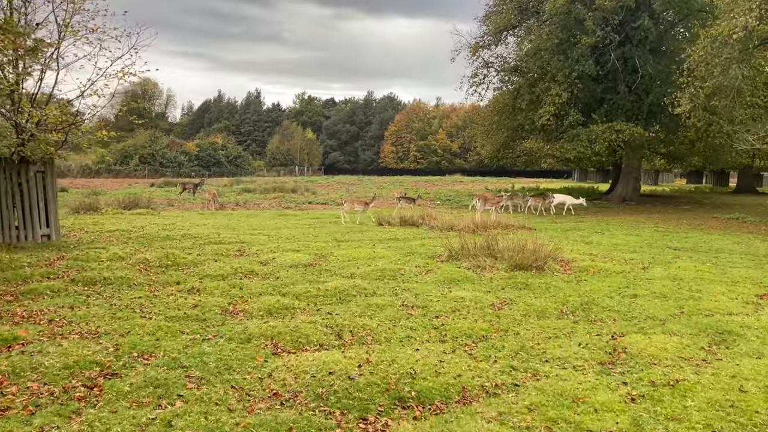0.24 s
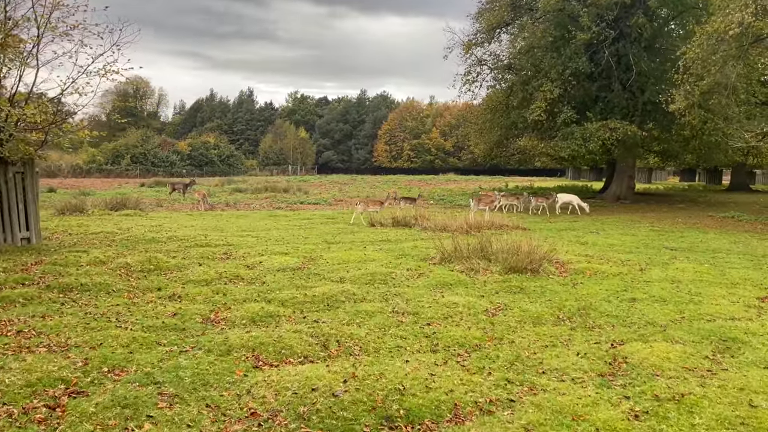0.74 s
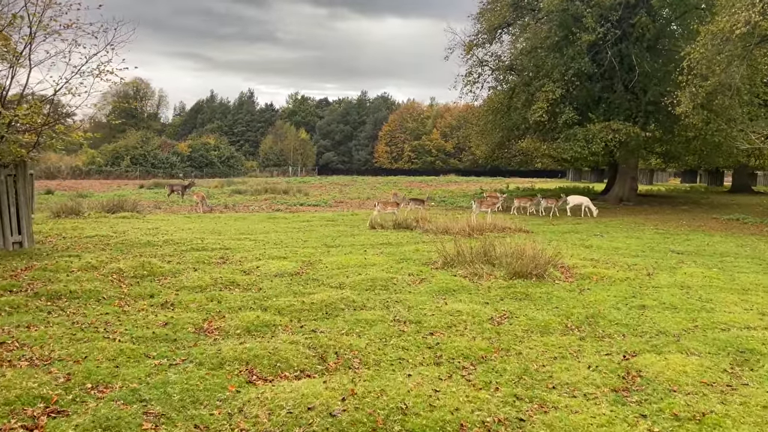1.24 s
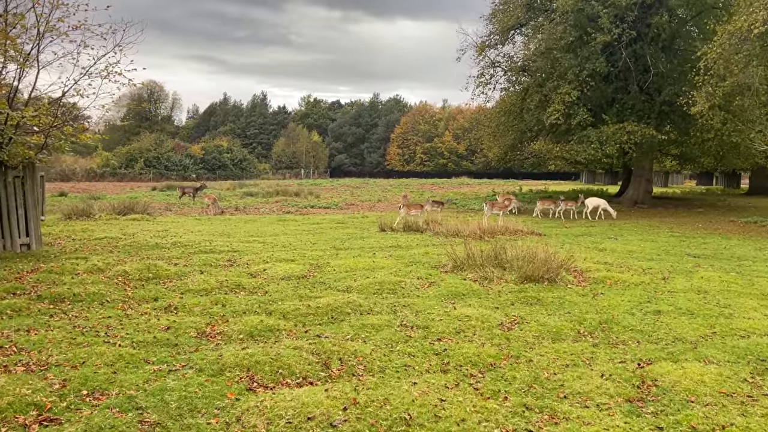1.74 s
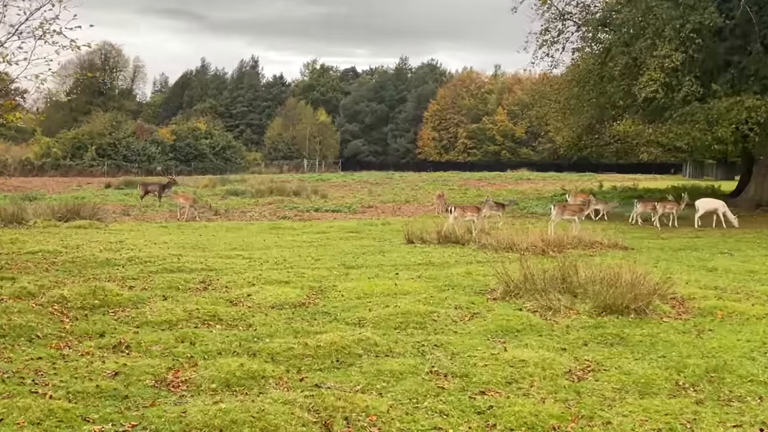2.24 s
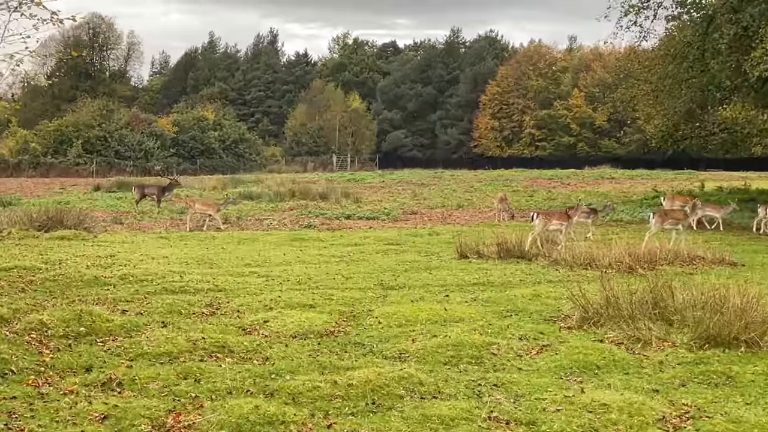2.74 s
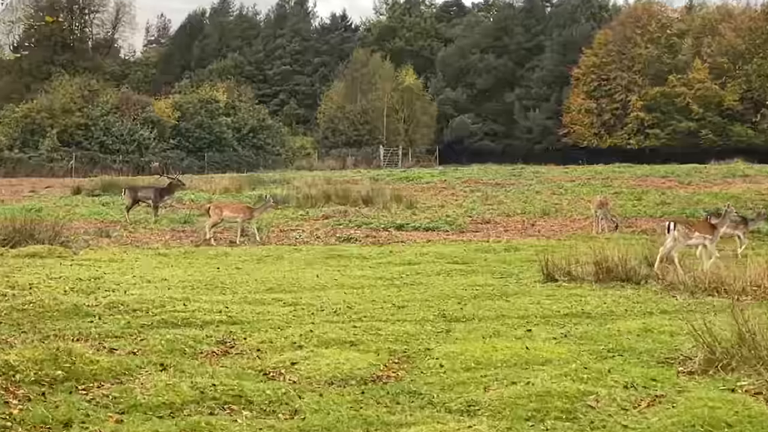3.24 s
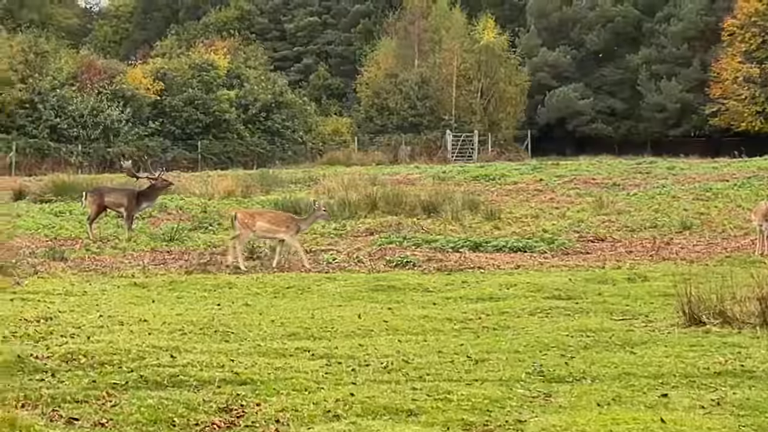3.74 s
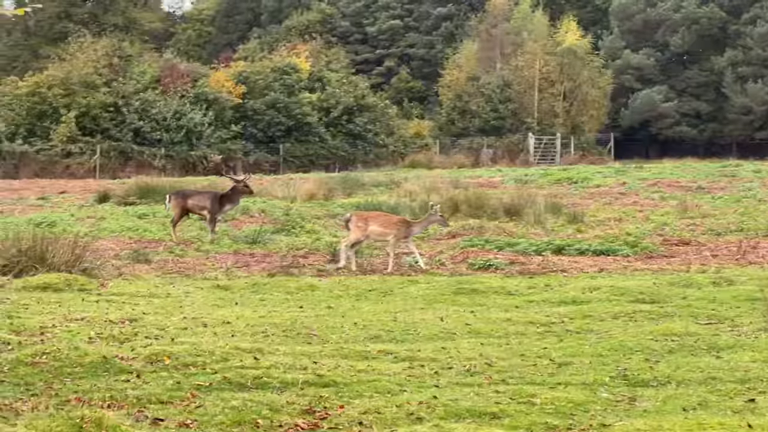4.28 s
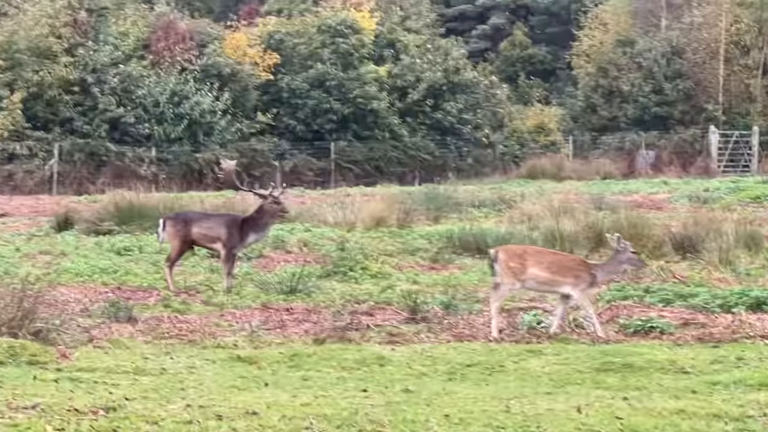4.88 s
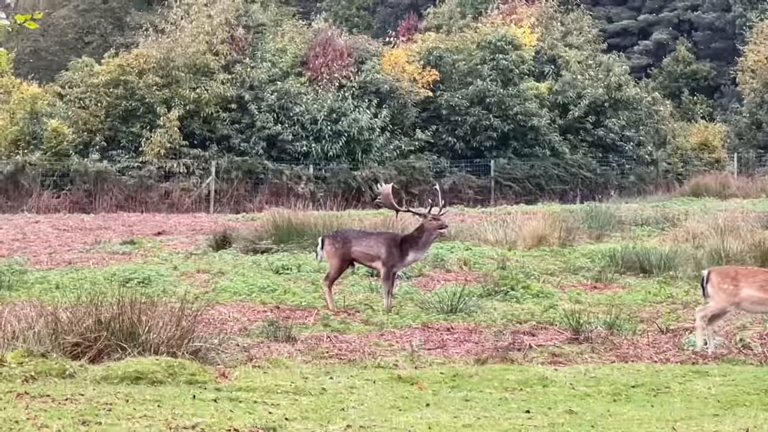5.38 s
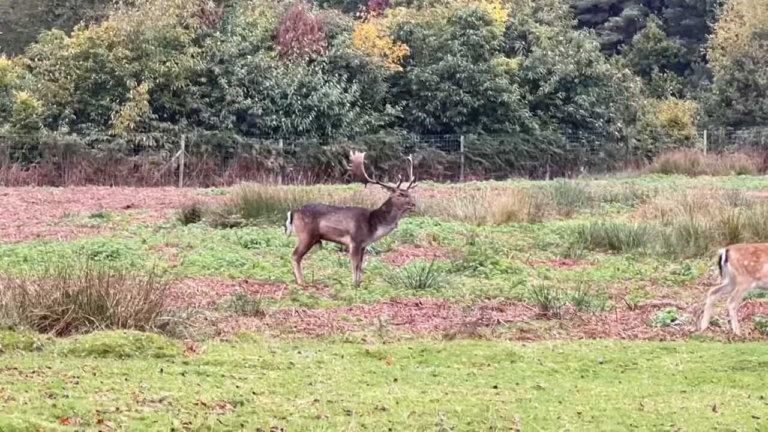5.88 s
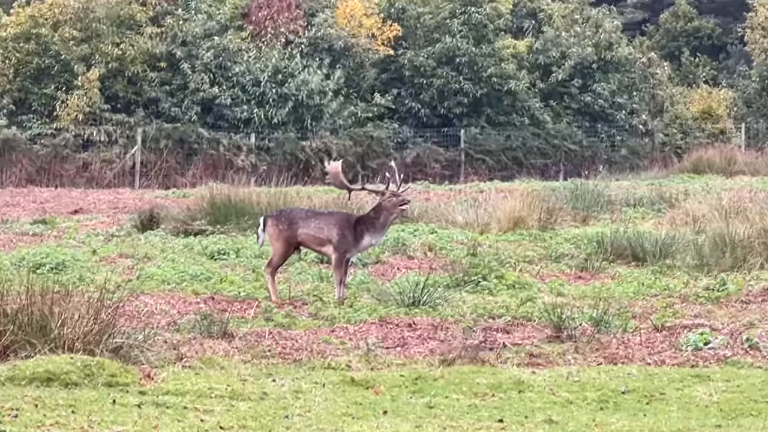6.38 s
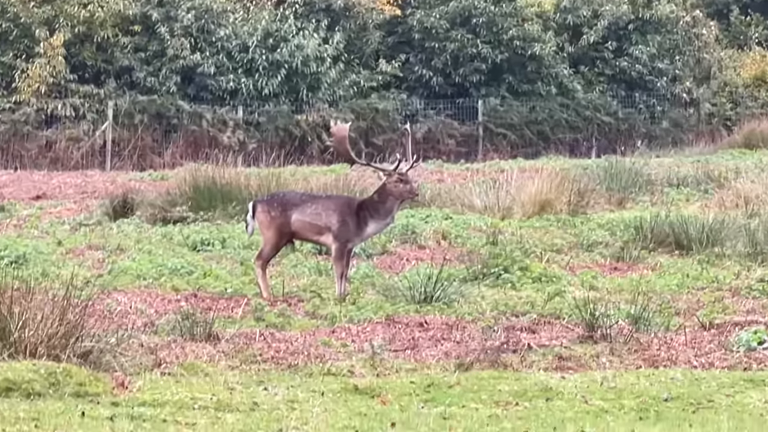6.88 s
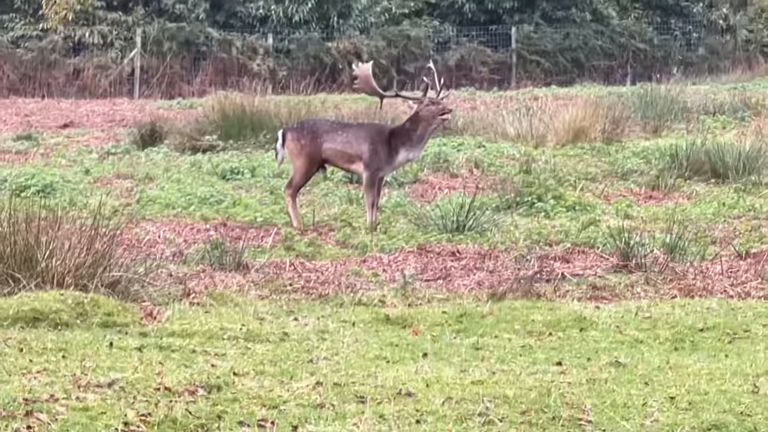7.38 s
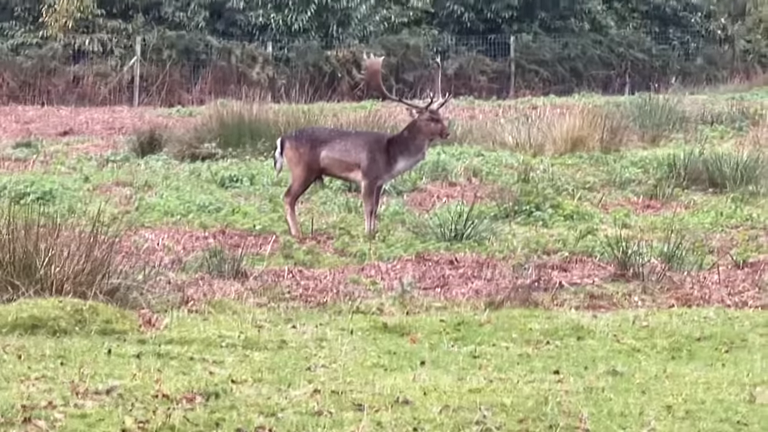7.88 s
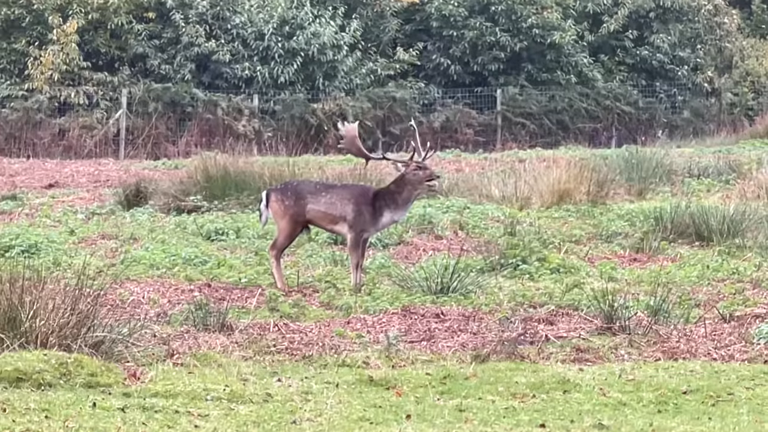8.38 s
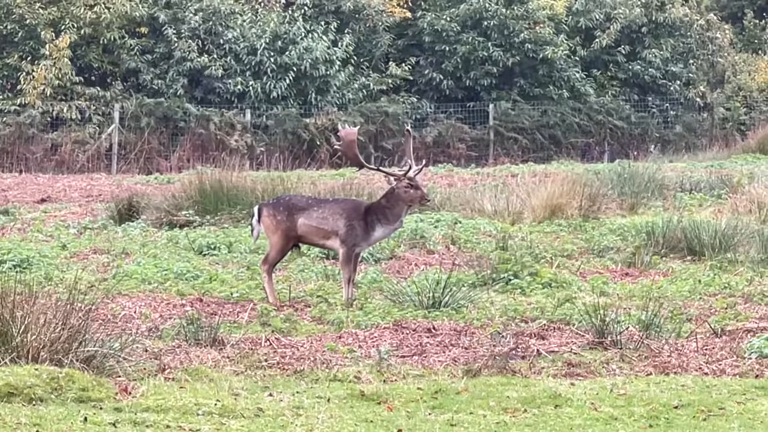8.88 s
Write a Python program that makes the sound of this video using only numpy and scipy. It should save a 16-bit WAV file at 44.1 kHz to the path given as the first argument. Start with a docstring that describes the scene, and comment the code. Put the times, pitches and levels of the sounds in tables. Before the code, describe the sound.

A hand-held outdoor stereo pickup with soft hiss and wavering low rumble catches a male deer's regular, croaking, belch-like groans, with a slight echo off trees. Jackdaws chirp thinly from a far wood at first. Around the middle come a burst of wind buffeting and two hard thumps; then bright, raspy falling jackdaw cries crowd in between groans before growing distant again.

```python
"""A wavering low rumble of distant traffic and wind and a faint, slowly rising high hiss of the recorder come first
and lie under it all, with a wash of the open land: shaped noise.
A fallow buck groans ten times across open parkland: slow glottal pulses ring a throat that lengthens in each groan.
Jackdaws, whistled harmonics with half lines and rasp, call from the far wood, then close by, then fainter.
Knocks and brushes sound on the hand-held microphone, and a strong gust buffets it halfway through."""
import sys
import numpy as np
from scipy import signal
from scipy.fft import rfft, irfft, next_fast_len
from scipy.io import wavfile

SR = 44100
rng = np.random.default_rng(int(sys.argv[2]) if len(sys.argv) > 2 else 0)


def wav_out(sig):
    """Save sig, one row per channel (or a flat mono array), as 16-bit PCM at SR to the path in sys.argv[1]."""
    wavfile.write(sys.argv[1], SR, np.round(np.clip(np.atleast_2d(sig).T, -1, 1) * 32767).astype(np.int16))


N = 402191
TIME = np.arange(N) / SR
EDGE_HZ = 11850  # upper band limit of the sound


def amp(db):
    """Level law: decibels to amplitude gain."""
    return 10 ** (np.asarray(db) / 20)


def evened(x):
    """Normalisation of power: scales to rms 1."""
    return x / np.sqrt(np.mean(x ** 2) + 1e-20)


def read(points, hz):
    """Interpolation of a spectrum along a logarithmic frequency axis."""
    f, value = np.transpose(points)
    return np.interp(np.log(hz + 1), np.log(f + 1), value)


def add(mix, s, sound):
    """Superposition: adds a sound into the mix at time s."""
    part = mix[max(round(s * SR), 0):][:len(sound)]
    part += sound[:len(part)]


def colour(x, gain):
    """Linear filtering: multiplies the spectrum by a gain given as a function of frequency."""
    n = x.shape[-1]
    size = next_fast_len(n + 1000)
    spectrum = rfft(x, size) * gain(np.fft.rfftfreq(size, 1 / SR))
    return irfft(spectrum, size)[..., :n]


def wander(n, hz):
    """Low-passed noise: a smooth random fluctuation of rms 1, up to about hz."""
    return evened(colour(rng.standard_normal(n), lambda f: np.exp(-(f / hz) ** 2)))


def band_level(x, low_hz, high_hz):
    """Band-limited power: the rms of x between two frequencies."""
    return np.std(colour(x, lambda f: (f > low_hz) & (f < high_hz)))


def field_noise(spectrum):
    """Spatial coherence: two-channel noise is partly alike at the two ports, by frequency."""
    # likeness of left and right: f/Hz, correlation [0-1]
    likeness = [(120, 0.89), (250, 0.61), (700, 0.016), (1800, 0.071), (2600, 0.75), (6000, 1),
                (9000, 0.98)]
    same = lambda f: np.clip(read(likeness, f), 0, .995)
    a, b = rng.standard_normal((2, N))
    mid = colour(a, lambda f: np.sqrt(1 + same(f)))
    side = colour(b, lambda f: np.sqrt(1 - same(f)))
    ports = np.array([mid + side, mid - side])
    return evened(colour(ports, lambda f: amp(read(spectrum, f))))


def rumble_and_gusts(gust_from_db=-36, gust_full_db=-24, waver_db=0.97):
    """Level-dependent spectrum: a low rumble of traffic and wind turns into broader buffeting as it grows."""
    # relative noise spectra of the rumble and of the buffeting: f/Hz, density level/dB
    rumble_spectrum = [(20, -43), (45, -2.5), (70, 0), (115, -4.5), (150, -11.5), (200, -20), (400, -33),
                       (800, -70)]
    gust_spectrum = [(20, -40), (55, -4), (105, -1.5), (160, -7), (250, -15), (330, -23.5), (520, -33.5),
                     (700, -56), (1200, -87)]
    # background rumble, before the waver: t/s, level/dB
    background = [(0, -41.5), (2.4, -42.5), (4.3, -40.5), (5.2, -38.5), (5.7, -51), (6.2, -40.5),
                  (6.7, -52.5), (7.2, -46.5), (8.1, -54.5), (9.12, -46)]
    # gusts: t/s of the centre, length/s, level/dB
    gusts = [(3.416, .16, -35.5), (3.852, 0.22, -36), (4.13, 0.093, -37.5), (4.52, 0.4, -34),
             (4.939, 0.49, -19), (5.961, .16, -37), (8.865, 0.26, -45.5)]
    ramp = .45  # share of a gust spent rising and falling
    power = amp(np.interp(TIME, *np.transpose(background)) + waver_db * wander(N, 4.9)) ** 2
    for s, length, peak_db in gusts:
        envelope = amp(peak_db) * signal.windows.tukey(int(length * SR), ramp)
        add(power, s - length / 2, envelope ** 2)
    db = 10 * np.log10(power)
    push = np.clip((db - gust_from_db) / (gust_full_db - gust_from_db), 0, 1)
    rumble = field_noise(rumble_spectrum)
    buffeting = field_noise(gust_spectrum)
    rumble = rumble / band_level(rumble, 30, 135)
    buffeting = buffeting / band_level(buffeting, 30, 135)
    blend = np.sqrt(1 - push) * rumble + np.sqrt(push) * buffeting  # crossfade of equal power
    return amp(db) * blend


def wash_and_hiss(split_hz=2800, waver_db=1.6):
    """Band-split noise: the far wash of the open land and a faint, slowly rising high hiss of the recorder."""
    # relative spectrum of wash and hiss: f/Hz, density level/dB
    noise_spectrum = [(100, -11.5), (200, -6.5), (350, -6.5), (600, -9), (900, -8.5), (1600, -16.5),
                      (2400, -18.5), (3600, -27), (7000, -29), (11000, -26)]
    # course of the two layers: t/s, low wash level/dB before the waver, high hiss level/dB
    levels = [(0, -51, -62.5), (1.6, -52, -62.5), (2.5, -53.5, -62), (5.1, -53.5, -60.5), (6.6, -53.5, -58),
              (8.1, -55, -59), (9.12, -53, -58)]
    s, low_db, high_db = np.transpose(levels)
    noise = field_noise(noise_spectrum)
    wash = colour(noise, lambda f: 1 / (1 + (f / split_hz) ** 4))
    hiss = noise - wash
    wash = wash / band_level(wash, 400, 1600)
    hiss = hiss / band_level(hiss, 4500, 9500)
    wash_gain = amp(np.interp(TIME, s, low_db) + waver_db * wander(N, 6))
    return wash * wash_gain + hiss * amp(np.interp(TIME, s, high_db))


def slaps(length, top_hz, top_s, push_s):
    """Relaxation rhythm: slaps of the vocal folds quicken with the push, then slacken and fade (times, dB)."""
    slack_hz = 23.3  # pulse rate without push
    release_s, release_db = 0.091, -11  # the groan dies away at its end
    t = np.arange(int(length * SR)) / SR
    rate = slack_hz + (top_hz - slack_hz) * np.exp(-((t - top_s) / push_s) ** 2)
    turns = np.cumsum(rate) / SR
    times = np.interp(np.arange(int(turns[-1]) + 1), turns, t)
    return zip(times, release_db * np.clip(1 - (length - times) / release_s, 0, 1))


def buck(rasp=0.058, rasp_s=0.0068, grit=.012, grit_s=0.026, scatter=0.016, shimmer_db=1.53):
    """Source and filter: each slap, with its puff of air, rings a throat lengthened by the sinking larynx."""
    # throat resonances before tuning: f/Hz larynx up, f/Hz larynx pulled down, width/Hz, level/dB
    throat = [(191, 186, 54, 6), (229, 258, 26.4, 2.5), (395, 402, 34, -4), (656, 516, 50, -6),
              (1132, 983, 37, -2.5), (1380, 1180, 54, -3.5), (1877, 1670, 52, -12), (1970, 2000, 53, -13),
              (2330, 2170, 56, -11), (2935, 2520, 67, -12), (3000, 2880, 100, -7), (3540, 3175, 160, -4),
              (5600, 5200, 810, -12), (8700, 8100, 1100, -13)]
    # groans: t/s, length/s, top pulse rate f/Hz, t/s of the top within the groan, width of the push/s,
    # strength level/dB, chest level/dB, treble level/dB, throat tuning [factor]
    groans = [(0.178, .3, 40.23, 0.13, .078, -34, -1.5, -3, 0.99),
              (1.062, 0.29, 36.46, 0.11, 0.06, -35, 2, -6.5, 0.99),
              (1.913, 0.27, 27.97, 0.089, 0.056, -36, 2.5, -5, 0.98),
              (2.824, 0.31, 33.53, 0.13, 0.083, -36.5, 2.5, 1, .99),
              (3.698, 0.24, 24.27, 0.12, 0.027, -39, 1, -1, 1),
              (4.494, 0.26, 31.73, 0.12, .059, -36, 2.5, -0.5, 1),
              (5.379, .335, 33.44, .112, .06, -33, -8, -2, 0.99),
              (6.202, 0.39, 27.63, 0.22, 0.11, -35, -7, -1.5, 1),
              (7.2, 0.357, 26.13, .071, .255, -36.5, -7, -0.5, 0.98),
              (8.36, 0.28, 24.01, 0.056, 0.064, -38, 1, 1.5, .99)]
    # mouth and ground shape the groan: f/Hz, level/dB
    groan_colour = [(50, -18), (130, 1), (200, 0), (560, 0.5), (760, 6), (1000, -2.5), (1350, -0.5),
                    (1530, -8.5), (1750, 0.5), (3600, 0), (4200, 5), (9000, 9)]
    pull_s, pull_lead_s = 0.13, 0.038  # the larynx starts to drop just before the voice sets in
    out, t = np.zeros(N), np.arange(4000) / SR
    up_hz, down_hz, width, mode_db = np.transpose(throat)
    sign = (-1) ** np.arange(len(throat))  # neighbouring tube modes ring in opposite senses
    decay = np.exp(-np.pi * width[:, None] * t)
    for start, length, top_hz, top_s, push_s, db, chest_db, treble_db, tuning in groans:
        for s, fade_db in slaps(length, top_hz, top_s, push_s):
            larynx_up = np.exp(-(s + pull_lead_s) / pull_s)
            hz = tuning * (down_hz + (up_hz - down_hz) * larynx_up)
            hz = hz * (1 + scatter * rng.standard_normal(len(throat)))
            tilt_db = read([(280, chest_db), (1000, 0), (3000, treble_db)], hz)
            gain = sign * amp(mode_db + tilt_db)
            cycles = hz[:, None] * t
            # each resonance needs about a cycle to build, so the chesty bass follows the click
            build = 1 - np.exp(-cycles)
            ring = gain @ (decay * build * np.sin(2 * np.pi * cycles))
            # a short puff, then a trickle of air that fills the gap to the next pulse
            breath = rasp * np.exp(-t / rasp_s) + grit * np.exp(-t / grit_s)
            slap = rng.standard_normal(len(t)) * breath
            slap[0] += 1
            # no two slaps are equally strong
            strength = amp(db + fade_db + shimmer_db * rng.standard_normal())
            add(out, start + s - .001, strength * signal.fftconvolve(slap, ring)[:len(t)])
    return colour(out, lambda f: amp(read(groan_colour, f)))


def trees(x, build_s=0.037, spread=0.15):
    """Diffuse reverberation: scattered echoes from trunks and crowns, each band dying at its own speed."""
    # echo of the trees: f/Hz, decay time t60/s
    wood = [(150, 0.57), (1000, 0.34), (3300, 0.75), (10000, 0.31)]
    taps = rng.standard_normal((2, SR)) * (rng.random((2, SR)) < .1)  # sparse reflections
    hz, t, z = signal.stft(taps, SR, nperseg=256)
    z = z * amp(-60 * t / read(wood, hz)[:, None]) * (1 - np.exp(-t / build_s))
    mid, side = signal.istft(z, SR, nperseg=256)[1]
    tail = np.array([mid + spread * side, mid - spread * side])
    return signal.fftconvolve(x[None], tail / np.linalg.norm(tail[0]), axes=1)[:, :N]


def caw(length, first_hz, last_hz, lateness, db, rough, tilt_db):
    """Period doubling: a whistled note scoops up and falls, with half lines between its harmonics."""
    # resonance of the beak: f/Hz, level/dB
    beak_curve = [(1200, -17.5), (2000, -3), (3200, 1), (4200, -1), (5200, -3.5), (6600, -6), (8200, -8.5),
                  (10000, -9), (12000, -9)]
    # deep falls break into period doubling: fall [octaves], doubling [0-1]
    doubling_curve = [(.2, 0.1), (.45, 0.75)]
    scoop, scoop_s = .4, .006  # share of the pitch by which the onset starts low, and its time
    warble, warble_hz, bend = .11, 170, 0.01245  # pitch fluctuations, as shares; warble grows with roughness
    burst = 0.77  # extra rasp at the onset
    t = np.arange(int(length * SR)) / SR
    u = t / t[-1]
    opening = np.exp(-(t / scoop_s) ** 2)
    pitch = first_hz * (last_hz / first_hz) ** (u ** lateness) * (1 - scoop * opening)
    slow_bend = bend * wander(len(t), 34.6)
    fast_warble = warble * rough ** 2 * wander(len(t), warble_hz)
    pitch = abs(pitch * (1 + slow_bend + fast_warble))
    doubling = np.interp(np.log2(first_hz / last_hz), *np.transpose(doubling_curve))
    half_turn = np.pi * np.cumsum(pitch) / SR
    k = np.arange(1, 9)[:, None]  # multiples of half the pitch; the odd ones are the half lines
    line_hz = k * pitch / 2
    beak = lambda f: amp(read(beak_curve, f) + tilt_db * np.log2(np.maximum(f / 3500, 1)))
    lines = beak(line_hz) * np.where(k % 2, doubling, 1) * (line_hz < EDGE_HZ)
    tone = evened((lines * np.sin(k * half_turn)).sum(0))
    rasp = evened(colour(rng.standard_normal(len(t)), beak))
    flutter = amp(2.07 * wander(len(t), 180))
    voice = evened(tone + (rough + burst * opening) * rasp) * flutter
    swell = np.interp(u, [0, .08, .75, 1], [0.85, 0.84, 1.165, 0.49])
    return amp(db) * voice * swell * signal.windows.tukey(len(t), .06)


def jackdaws(direct_db=-.5, near_echo_db=-13, far_echo_db=1):
    """Direct-to-reverberant ratio: the faint, far birds of the flock are heard mostly by their echo."""
    # calls: t/s, held note length/s, fall length/s, top f/Hz, last f/Hz, lateness of the fall [power],
    # level/dB as heard, faint for far birds, roughness [0-1], treble tilt above 3500 Hz [dB/octave]
    calls = [(.361, 0.0091, 0.29, 2150, 1970, 0.75, -71, 0.75, -30),
             (.869, 0, .065, 3870, 3350, 1.03, -57.5, 0.2, -3),
             (.946, 0, 0.095, 4090, 3330, 0.94, -62, .4, 2),
             (1.122, 0.0041, 0.039, 3790, 3220, 1.14, -52.5, .4, 4),
             (1.355, 0.003, 0.083, 3810, 3260, 0.96, -60, 0.32, -1),
             (1.748, 0, .16, 3800, 3200, 0.97, -61, 0.72, 2.5),
             (2.003, 0.0034, 0.22, 3570, 3346, 0.9, -58, .45, 0),
             (2.679, .295, .12, 4190, 3180, 0.78, -49.5, 0.83, 0.5),
             (4.114, 0.0084, 0.18, 2610, 2390, 1, -67.5, 0.5, -20),
             (4.416, 0.09, 0.092, 4220, 3020, .9, -43, .77, 1.5),
             (5.189, 0.065, 0.074, 4430, 2700, 2.06, -37, 0.73, 3),
             (5.444, 0.037, 0.095, 4400, 2890, .95, -40.5, 0.44, 0.5),
             (5.797, .068, 0.082, 4433, 2520, 1.6, -38.7, 0.34, 2.5),
             (6.22, 0.047, 0.095, 4460, 2960, 0.98, -40.7, 0.44, 1.8),
             (6.472, 0.0011, .14, 4160, 2648, 0.81, -42.5, 0.37, -2.5),
             (6.769, 0.0025, 0.15, 4090, 2330, 3.8, -42.5, .45, -4.5),
             (6.839, 0.0037, .16, 4650, 2567, 0.92, -41, 0.29, -.5),
             (7.088, 0.0065, .112, 4070, 3730, 3.3, -38.5, 0.9, 1),
             (7.182, 0, 0.095, 4210, 2460, 1.8, -39, .8, 0), (7.484, 0, .14, 3875, 2560, 0.9, -46, 0.3, -7),
             (7.685, 0, .15, 4340, 2440, 1.05, -38.5, 0.26, 0.5),
             (7.815, 0.0035, .12, 3504, 2510, 1.1, -46.5, 0.21, -6),
             (7.981, 0.0056, 0.14, 4320, 3016, 3.5, -43.5, 0.45, -11),
             (8.376, 0, .13, 3490, 2590, .9, -52.5, 0.52, -12),
             (8.649, 0, .16, 3750, 2490, 0.93, -53, 0.43, -5),
             (8.951, 0, 0.1, 3400, 2520, 0.94, -60, 0.42, -11)]
    # the held note sags below the top pitch (shares of it) and is a little softer
    held_from, held_to, held_db = .785, .69, -2
    overlap_s = .005  # the held note runs into the fall
    direct, sent = np.zeros((2, N))
    for s, held_s, fall_s, top_hz, last_hz, lateness, db, rough, tilt_db in calls:
        notes = [(s + held_s, caw(fall_s, top_hz, last_hz, lateness, db, rough, tilt_db))]
        if held_s > overlap_s:
            held = caw(held_s + overlap_s, held_from * top_hz, held_to * top_hz, 1,
                       db + held_db, rough, tilt_db)
            notes.append((s, held))
        echo_db = np.interp(db, [-60, -43], [far_echo_db, near_echo_db])
        for start, note in notes:
            add(direct, start, note)
            add(sent, start, amp(echo_db) * note)
    return amp(direct_db) * direct + trees(sent, spread=0.23)


def handling(lumpy_db=3.5):
    """Structure-borne sound: short damped knocks and lumpy rubbing noise on the microphone's housing."""
    # knocks of air and hand: t/s, level/dB, f/Hz
    thumps = [(2.999, -21, 282), (4.418, -23, 139.1), (5.057, -13.5, 280), (5.084, -9.5, 260),
              (5.21, -25.5, 230), (5.236, -24.5, 274), (5.916, -30, 159.9), (5.975, -34, 201),
              (6.01, -32.5, 330), (6.171, -31.5, 383), (6.288, -29.5, 354), (7.24, -27.5, 379.9),
              (7.524, -31, 555)]
    # brushes of hand and sleeve: t/s, length/s, level/dB, centre f/Hz, width [octaves]
    brushes = [(0.637, 0.084, -49.5, 11100, 1), (0.638, 0.07, -56.5, 895, 0.26),
               (4.732, 0.014, -50, 6505, 0.8), (5.858, 0.44, -47.5, 255, 0.79),
               (6.249, 0.302, -49, 336, 0.86), (6.947, 0.37, -52, 379, 0.73)]
    out, t = np.zeros(N), np.arange(2000) / SR
    for s, db, hz in thumps:
        cycles = hz * t
        envelope = (2 * cycles * np.exp(1 - 2 * cycles)) ** 2  # peaks after half a cycle
        add(out, s - .002, amp(db) * np.sin(2 * np.pi * cycles) * envelope)
    for s, length, db, hz, octaves in brushes:
        n = int(length * SR)
        band = lambda f: np.exp(-(np.log2((f + 1) / hz) / octaves) ** 2 / 2)
        rub = colour(rng.standard_normal(n), band)
        lumpy = evened(rub * amp(lumpy_db * wander(n, 50)))
        add(out, s, amp(db) * lumpy * signal.windows.tukey(n, .5))
    return out


def scene(buck_echo_db=-9, buck_side_db=3.0):
    """Superposition of all sources; a level difference leans the buck's midrange to the left."""
    groans = buck()
    sides = np.array([[1], [-1]])
    lean = lambda f: amp(sides * read([(400, 0), (1200, buck_side_db), (2500, 0)], f))
    echo = trees(groans, build_s=0.013, spread=0.63)
    deer = colour(groans, lean) + amp(buck_echo_db) * echo
    return rumble_and_gusts() + wash_and_hiss() + deer + jackdaws() + handling()


def record(dry):
    """Phase difference: two ports drift apart in the high treble; then comes the band limit."""
    # phase between the ports: f/Hz, lead of the left [rad]
    ports = [(2200, 0), (3200, .6), (5000, .4), (6500, .1), (8850, 0), (9250, -1.4), (10250, -3.14),
             (11000, -4.6), (11650, -6.28)]
    # response of the microphone: f/Hz, level/dB
    microphone = [(10700, -0.5), (11300, -6), (12000, -32.5)]
    sides = np.array([[1], [-1]])
    phase = lambda f: np.exp(.5j * sides * read(ports, f))
    heard = colour(dry, lambda f: amp(read(microphone, f)) * phase(f))
    low_pass = signal.firwin(511, EDGE_HZ, window=("kaiser", 9), fs=SR)
    return signal.oaconvolve(heard, low_pass[None], "same")


dry = scene()
out = record(dry)
wav_out(out)
```